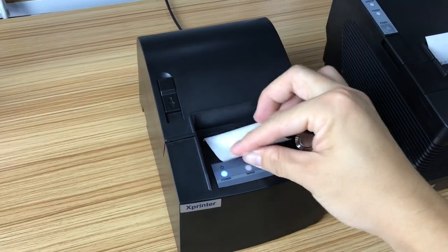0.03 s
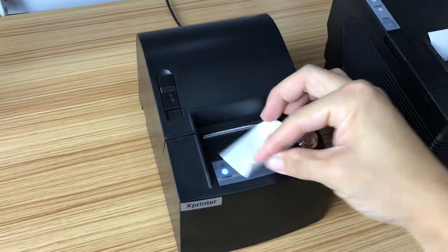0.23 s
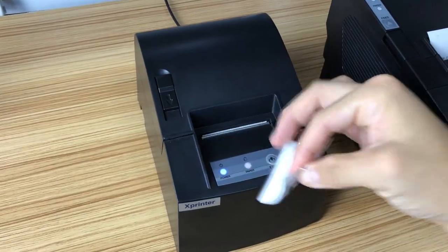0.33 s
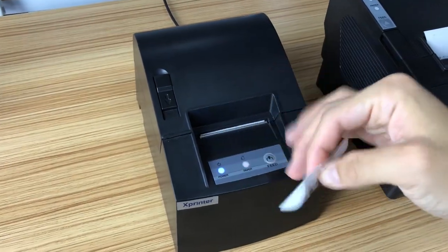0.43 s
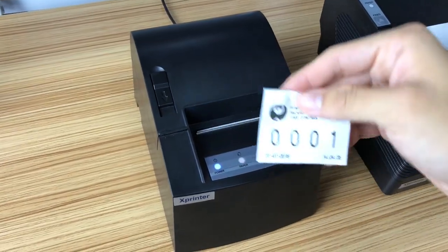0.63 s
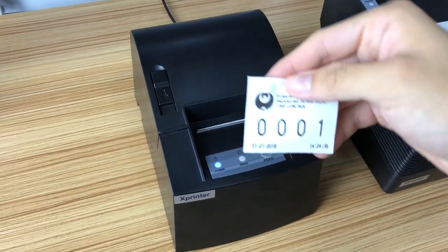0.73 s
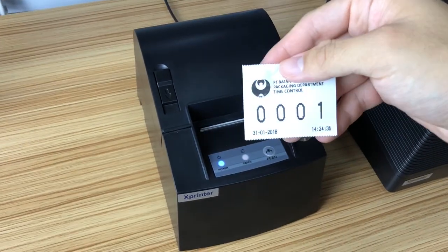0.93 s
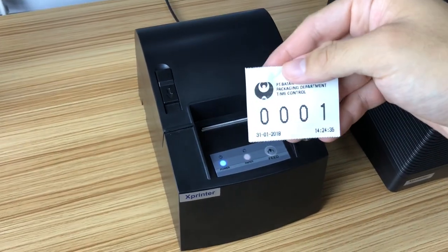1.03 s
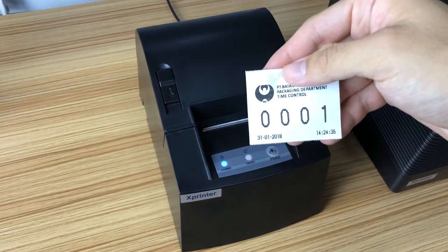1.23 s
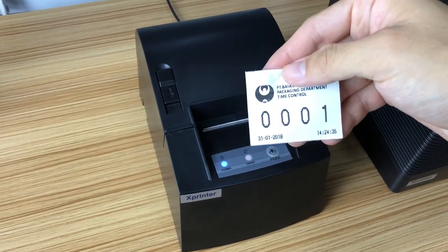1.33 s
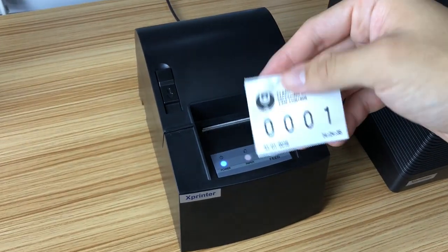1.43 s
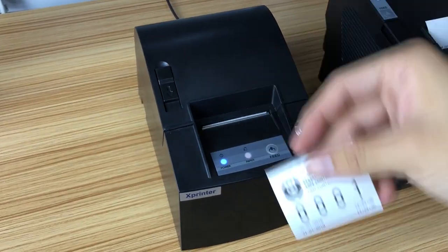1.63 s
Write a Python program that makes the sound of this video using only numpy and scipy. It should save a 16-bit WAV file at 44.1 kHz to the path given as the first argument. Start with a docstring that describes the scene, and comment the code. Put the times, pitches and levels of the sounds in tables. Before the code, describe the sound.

A paper ticket rips across the toothed edge of a small printer and comes free with a snap. Faint ticks and fingers sliding on the paper follow, over a low ventilation hum in a quiet room.

```python
"""Ticket torn off a desk printer.

A hand rips a paper ticket across the toothed edge of a small printer in a quiet room. The paper catches, runs
over the teeth ever harder and parts with a snap, all showers of fibre clicks; the tugs ring the plastic case,
and the sheet flicks sharply as it parts. Then scattered faint ticks and fingers sliding on the ticket, over a
low ventilation hum."""
import sys
import numpy as np
from scipy import signal
from scipy.fft import rfft, irfft
from scipy.io import wavfile
from scipy.ndimage import uniform_filter1d

SR = 44100
rng = np.random.default_rng(int(sys.argv[2]) if len(sys.argv) > 2 else 0)


def master(y):
    """Save y as 16-bit WAV."""
    cut = np.clip(np.atleast_2d(y).T, -1, 1)
    pcm = np.round(cut * 32767)  # scale
    wavfile.write(sys.argv[1], SR, pcm.astype(np.int16))


N = 74970
T = np.arange(N) / SR
FREQS = np.maximum(np.arange(N + 1) * SR / (2 * N), 1)
TOP_HZ = 15700
FIBRES_PER_S, FIBRE_SCATTER_DB, CRACK_ATTACK_S = 20000, 2, .0003

# ventilation air spectrum: f/Hz, level/dB
AIR_SPECTRUM = [(24, -34), (40, -3.5), (96, -11.5), (114, -8), (202, -3.5), (224, -8), (294, -9),
                (317, -14.5), (350, -12), (562, -20), (606, -15), (1100, -19), (1410, -22), (1820, -23),
                (2990, -32), (7340, -39), (9890, -42.5), (10900, -44.5), (15500, -46)]
# ventilation hums: f/Hz, level/dB
VENT_HUMS = [(43, -65.5), (91, -59), (199, -61)]
# reverberation bands: f/Hz, t60/s, level/dB
ROOM_BANDS = [(300, 0.544, -9.5), (1000, .65, -6.5), (2300, 1, -15), (5500, 0.74, -14.5), (9000, 0.54, -20),
              (14000, 0.47, -20.5)]
# finger friction envelope: t/s, level/dB
SLIDE_ENVELOPE = [(0, -69), (.125, -67), (.145, -56), (.18, -61), (.61, -69), (.632, -57), (.655, -61.5),
                  (.69, -61.5), (.72, -62), (.8, -62.5), (.85, -69.5), (1, -81.5), (1.1, -65), (1.3, -78.5),
                  (1.42, -68), (1.52, -68), (1.537, -51), (1.605, -52.5), (1.618, -56.5), (1.66, -53),
                  (1.68, -63), (1.7, -63)]
# finger friction spectrum: f/Hz, level/dB
SLIDE_SPECTRUM = [(500, -3.5), (2400, -12), (3300, 1), (4100, -7.5), (5400, -1.5), (6200, -4), (7000, -2),
                  (7700, -4.5), (9700, -8.5), (10500, -3.5), (11500, -10), (14300, -11.5), (15500, -8)]
# flicks of the sheet: t/s, level/dB, decay/s, ring f/Hz, low-pass f/Hz
SHEET_TICKS = [(0.157, -48, 0.0047, 4200, 7000), (0.3735, -26, 0.0062, 2170, 2510),
               (0.3765, -26.5, 0.001, 1520, 2220), (0.571, -43, 0.0017, 3570, 9000),
               (0.6189, -36.5, 0.0034, 3540, 3770), (.72, -53.5, 0.0047, 5570, 7000),
               (1.643, -44.5, 0.0035, 796, 1380), (1.651, -48.5, .009, 5360, 6500),
               (1.662, -50, 0.002, 5400, 14000)]
# flick spectrum: f/Hz, level/dB
TICK_SPECTRUM = [(400, -11), (1200, 2.5), (3700, -2), (8000, -2.5), (16000, -2.5)]
# printer case modes: f/Hz, level/dB, t60/s
CASE_MODES = [(370, -8, 0.013), (475, -7.5, 0.032), (534, 0.5, .06), (618.4, -4.5, .06), (658, -4.5, 0.24),
              (700, -0.5, .16), (830, -16.5, 0.03), (1152, -3.5, .14), (1155, 4.5, 0.16),
              (1283, -13.5, 0.062), (1610, -5.5, 0.1), (1720, -8.5, .05), (2300, -10, 0.024),
              (2640, -15.5, 0.071)]
# load on the case: t/s, level/dB
CASE_LOAD = [(.19, -52.5), (.205, -41.5), (.22, -34), (.23, -46.5), (.24, -32.5), (.268, -41.5),
             (.283, -35.5), (.34, -35.5), (.376, -44.5), (.385, -71)]
# paper catching on a tooth: t/s, level/dB, decay/s, ring f/Hz
TOOTH_CATCHES = [(.1432, -42.5, .001, 7000), (.1575, -43.5, .002, 11500), (.1858, -30.5, .001, 12500),
                 (.1915, -30, 0.00181, 11000), (.2008, -27.5, 0.0017, 12000), (.2052, -26.5, .0016, 7200),
                 (.2107, -35.5, .0008, 12000), (.2146, -22, 0.0034, 12200), (.2198, -37, 0.0011, 12200),
                 (.2352, -20.5, .0012, 12500), (.2392, -21.5, .0022, 12000), (.2442, -30, .0012, 11000),
                 (.2492, -24, .003, 9500), (.2988, -25.5, 0.00088, 12500), (.305, -20, .0017, 12500),
                 (.3365, -22.5, .003, 9500), (.3462, -26, .003, 5000), (.3525, -21, 0.0016, 11800),
                 (.3562, -16, .0013, 10000), (.3598, -17.5, .0015, 11500), (.3617, -20.5, 0.0032, 7000)]
# catch spectrum: f/Hz, level/dB
CATCH_SPECTRUM = [(250, -32.5), (450, -7), (700, -8), (1000, -14), (1500, 1), (2800, -4.5), (4200, -1.5),
                  (8000, -3), (12000, -1.5), (16000, -4)]
# last fibres parting: t/s, level/dB, decay/s
FINAL_SNAPS = [(0.3691, -28, .001), (0.3705, -13, 0.0022), (0.3724, -19.5, .0034)]
# snap spectrum: f/Hz, level/dB
SNAP_SPECTRUM = [(180, -49), (300, -14), (781, -20), (1070, -19.5), (1370, -8), (2040, -7), (3180, -22),
                 (3810, -6), (5660, -8), (7370, -1.5), (8420, -9), (9140, 1.5), (10400, -8.5),
                 (12100, -3.5), (15500, -16)]
# running tear envelope: t/s, level/dB
TEAR_ENVELOPE = [(.186, -55), (.203, -37), (.212, -54), (.222, -44), (.23, -57.5), (.24, -34.5),
                 (.265, -31), (.285, -28), (.305, -29.5), (.32, -27), (.342, -26.5), (.357, -32.5),
                 (.364, -32.5), (.369, -52), (.378, -81.5)]
# running tear spectrum: f/Hz, level/dB
TEAR_SPECTRUM = [(220, -39.5), (380, -33), (550, -34.5), (950, -4), (1500, -8.5), (2000, -9.5), (2800, -10),
                 (3250, -7.5), (3700, 0), (4400, -6), (5100, -3.5), (5900, -8), (7000, -2.5), (8000, -7),
                 (9400, -1.5), (10300, -2.5), (12000, -2), (14000, -3.5), (15500, -3.5)]
# resonances of the freed sheet: f/Hz, width/Hz, level/dB
SHEET_MODES = [(1550, 300, -4), (2750, 210, 11.5), (3750, 800, -10), (3940, 900, -18), (5000, 2100, 9),
               (6590, 780, -10.5), (9550, 1100, -11)]


def undb(db):
    """Decibels to gain."""
    return 10 ** (np.asarray(db) / 20)


def unit(x):
    """Scale to rms 1."""
    return x / np.sqrt(np.mean(x ** 2))


def even(x, samples):
    """Hold the running rms near 1."""
    return x / np.sqrt(np.abs(uniform_filter1d(x ** 2, size=samples)) + 1e-9)


def envelope(rows):
    """Gain over time from rows of t/s, level/dB."""
    return undb(np.interp(T, *np.array(rows).T))


def filtered(x, response):
    """Apply a frequency response."""
    return irfft(rfft(x, 2 * N) * response)[:N]


def colour(x, spectrum):
    """Filter by rows of f/Hz, level/dB; output rms 1."""
    hz, db = np.array(spectrum).T
    return unit(filtered(x, undb(np.interp(np.log(FREQS), np.log(hz), db))))


def resonance(hz, width_hz):
    """Band-pass response, gain 1 at its centre."""
    return 1 / (1 + 1j * (FREQS ** 2 - hz ** 2) / (FREQS * width_hz))


def fibres(scatter_db=FIBRE_SCATTER_DB):
    """Dense tiny clicks of uneven size."""
    signs = rng.choice([-1, 1], N)
    hits = rng.random(N) < FIBRES_PER_S / SR
    sizes = undb(scatter_db * rng.standard_normal(N))
    return even(signs * hits * sizes, samples=180)


def burst(start_s, decay_s):
    """Crack envelope: quick rise, brief hold, exponential fall."""
    age_s = np.maximum(T - start_s, 0)
    rise = np.minimum(age_s / CRACK_ATTACK_S, 1)
    return rise * np.exp(-np.maximum(age_s - 2 * CRACK_ATTACK_S, 0) / decay_s)


def cracks(rows, spectrum, width_hz, ring_db):
    """Short showers of fibre clicks, each ringing the sheet at its own pitch."""
    grain, out = colour(fibres(), spectrum), 0
    for start_s, db, decay_s, hz in rows:
        ring = undb(ring_db) * unit(filtered(grain, resonance(hz, width_hz)))
        out += undb(db) * burst(start_s, decay_s) * even(grain + ring, samples=70)
    return out


def ventilation(air_db=-51.5, hum_width_hz=7):
    """Dull steady air noise with three wavering hums."""
    out = undb(air_db) * colour(rng.standard_normal(N), AIR_SPECTRUM)
    for hz, db in VENT_HUMS:
        band = rfft(rng.standard_normal(2 * N)) * resonance(hz, hum_width_hz) ** 2
        out += undb(db) * unit(irfft(band)[:N])
    return out


def all_directions(x, diffuse_hz=3000):
    """Sound radiated all round: the sheet's narrow peaks even out."""
    power = np.abs(rfft(x, 2 * N)) ** 2
    broad, narrow = uniform_filter1d(power, size=14000), uniform_filter1d(power, size=1200)
    flatten = np.sqrt(np.abs(broad / narrow))
    return filtered(x, flatten ** np.minimum(FREQS / diffuse_hz, 1))


def room(x, delay_s=.006):
    """Diffuse reflections that die soonest in the top treble."""
    hz, t60s, db = np.array(ROOM_BANDS).T
    age_s = np.maximum(T - delay_s, 0)
    noise, tail = rng.standard_normal(N), 0
    for share, t60_s, gain in zip(np.eye(len(hz)), t60s, undb(db)):
        band = filtered(noise, np.interp(np.log(FREQS), np.log(hz), share))
        fade = (age_s > 0) * undb(-60 * age_s / t60_s)
        tail += gain * band * fade / np.linalg.norm(fade)
    return filtered(x, rfft(tail, 2 * N))


def fingers(flutter_db=1.5):
    """Skin rubs on the ticket with a fine, fluttering grain."""
    flutter = unit(filtered(rng.standard_normal(N), resonance(hz=35, width_hz=50) ** 2))
    grain = colour(fibres(scatter_db=2.5), SLIDE_SPECTRUM)
    return grain * envelope(SLIDE_ENVELOPE) * undb(flutter_db * flutter)


def ticks():
    """Short flicks of the sheet, each with its own pitch and treble cut-off."""
    out = 0
    for *row, edge_hz in SHEET_TICKS:
        flick = cracks([row], TICK_SPECTRUM, width_hz=270, ring_db=-4.5)
        low_pass = 1 / (1 + 1.2j * FREQS / edge_hz - (FREQS / edge_hz) ** 2)
        out += filtered(flick, low_pass)
    return out


def printer_case(tugs):
    """Tugs on the cutter ring the plastic case, which radiates little below its modes."""
    modes = 0
    for hz, db, t60_s in CASE_MODES:
        radiation = np.minimum(FREQS / hz, 1) ** 2
        modes += undb(db) * resonance(hz, np.log(1000) / np.pi / t60_s) * radiation
    grain = fibres()
    force = grain * tugs * envelope(CASE_LOAD)
    return filtered(force, modes) / np.std(filtered(grain, modes))


def catches():
    """Paper catches on a tooth and gives way."""
    return cracks(TOOTH_CATCHES, CATCH_SPECTRUM, width_hz=1600, ring_db=.5)


def snap():
    """The last corner of the ticket lets go."""
    grain = even(colour(fibres(), SNAP_SPECTRUM), samples=40)
    return grain * sum(undb(db) * burst(start_s, decay_s) for start_s, db, decay_s in FINAL_SNAPS)


def tooth_tugs(teeth_per_s=260, jitter=.3, scatter_db=1.1, band_scatter_db=2):
    """Uneven tugs from tooth to tooth: one envelope for each of six bands, low to high."""
    gap, weakness, *tint = rng.standard_normal((80, 8)).T
    starts_s = TEAR_ENVELOPE[0][0] + np.cumsum(np.exp(jitter * gap)) / teeth_per_s
    sizes = undb(band_scatter_db * np.array(tint) - scatter_db * weakness)
    pulses = np.array([burst(start_s, decay_s=.003) for start_s in starts_s])
    return even(sizes @ pulses, samples=800)


def tear(tugs, growth_db_per_s=175.5, free_at_s=.37):
    """Fibres break at every tug; the sheet rings more as it comes free."""
    grain, rip = even(colour(fibres(), TEAR_SPECTRUM), samples=90), 0
    centres_hz = np.linspace(0, TOP_HZ, len(tugs))
    for tug, share in zip(tugs, np.eye(len(tugs))):
        rip += tug * filtered(grain, np.interp(FREQS, centres_hz, share))
    modes = sum(undb(db) * resonance(hz, width_hz) for hz, width_hz, db in SHEET_MODES)
    freed = undb(growth_db_per_s * np.minimum(T - free_at_s, 0))
    return envelope(TEAR_ENVELOPE) * (rip + freed * filtered(rip, modes))


def scene():
    """Rip and handling in the ventilated room, mono."""
    tugs = tooth_tugs()
    rip = catches() + tear(tugs) + snap() + printer_case(tugs[0])
    direct = rip + ticks() + fingers()
    return (direct + room(all_directions(direct)) + ventilation())[None]


def record(dry):
    """The microphone drops the deepest bass and cuts the top."""
    high_pass = signal.butter(10, 38, "high", fs=SR, output="sos")
    low_pass = signal.ellip(10, .2, 80, TOP_HZ, fs=SR, output="sos")
    return signal.sosfilt(low_pass, signal.sosfilt(high_pass, dry))


dry = scene()
out = record(dry)
master(out)
```